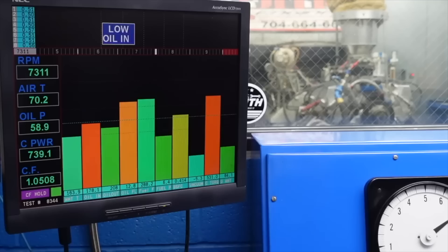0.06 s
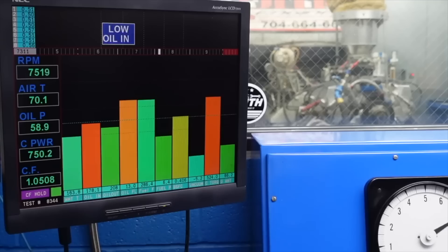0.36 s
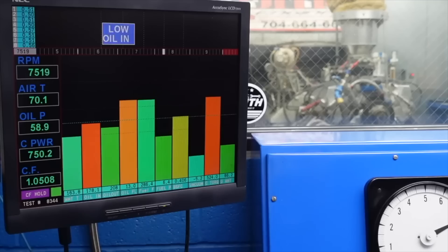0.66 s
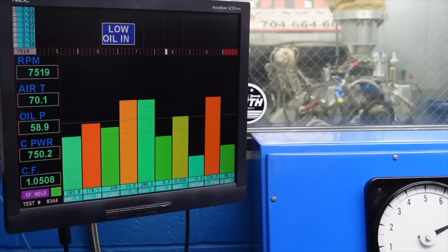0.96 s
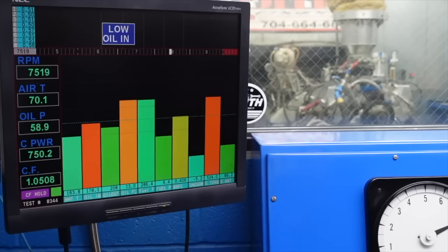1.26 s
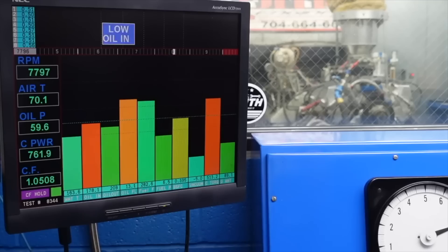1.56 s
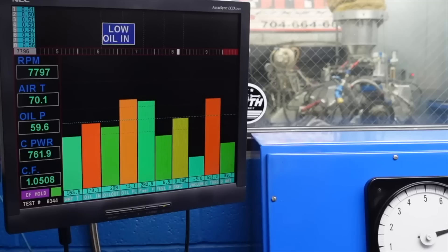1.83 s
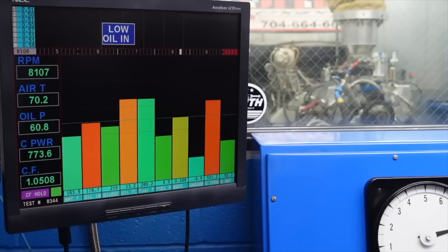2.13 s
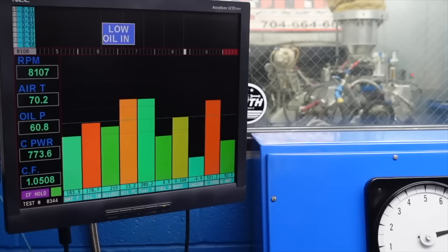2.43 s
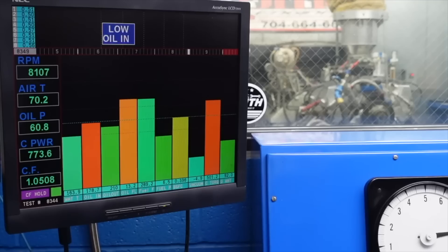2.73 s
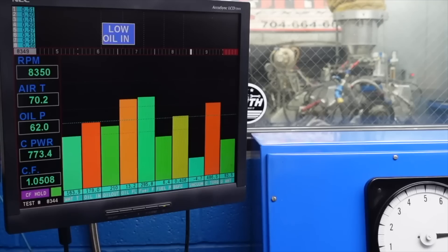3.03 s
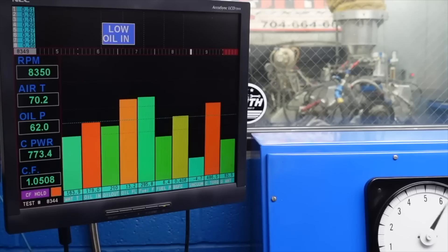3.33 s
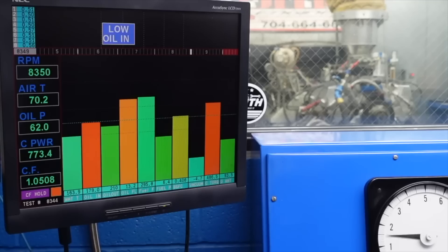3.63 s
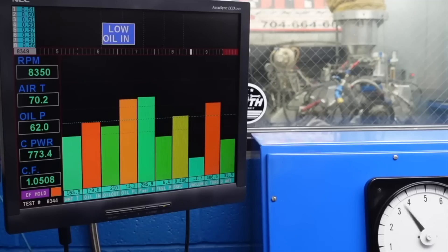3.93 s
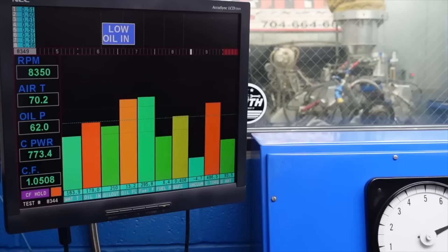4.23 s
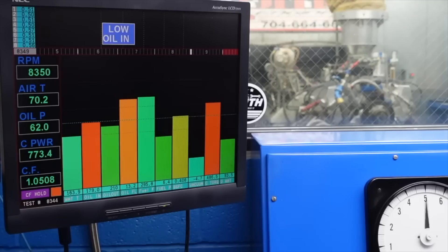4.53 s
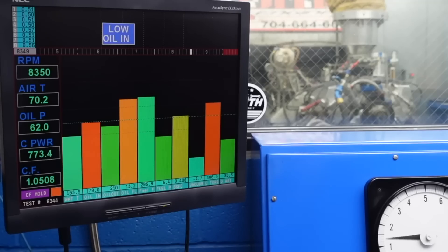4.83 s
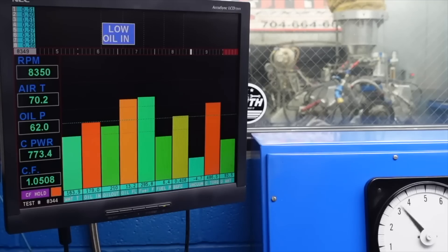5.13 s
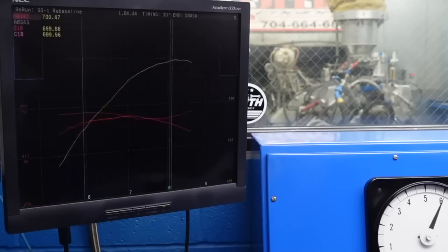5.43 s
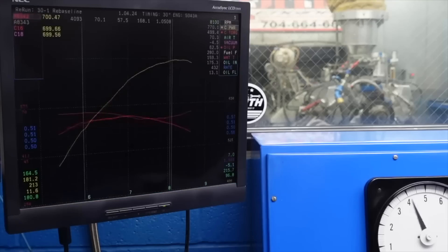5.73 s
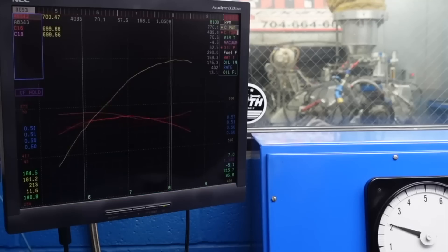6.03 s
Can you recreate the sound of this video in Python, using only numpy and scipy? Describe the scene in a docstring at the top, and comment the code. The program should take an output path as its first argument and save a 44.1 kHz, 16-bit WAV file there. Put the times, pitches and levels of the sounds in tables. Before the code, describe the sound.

A high-revving V8 climbs on a dyno behind glass, drops with pops and a brief howl, then idles quickly.

```python
"""An engine test cell, heard from the desk behind its window: a racing V8 pulls hard on the dyno.
Its firing orders climb through the standing waves of pipes and cell, over the roar of exhaust gas,
the rasp of headers and valve gear and the hiss of the intake. The throttle snaps shut, the exhaust
pops and howls on the overrun, and the engine catches and settles to a fast idle.
On this side of the glass, keys click faintly at the desk."""
import sys
import numpy as np
from scipy import signal
from scipy.fft import rfft, irfft, next_fast_len
from scipy.io import wavfile

SR = 44100
rng = np.random.default_rng(int(sys.argv[2]) if len(sys.argv) > 2 else 0)


def wrap_up_sound(samples):
    """Save the sound to the file named by the first command line argument, as 16-bit audio."""
    columns = np.atleast_2d(samples).T
    # keep every value between -1 and 1, then stretch to whole-number steps
    tamed = np.clip(columns, -1, 1)
    steps = np.round(tamed * 32767).astype(np.int16)
    wavfile.write(sys.argv[1], SR, steps)


N = 277029
TIME = np.arange(N) / SR
SIZE = next_fast_len(N)
BINS = np.fft.rfftfreq(SIZE, 1 / SR)
LIFT_S, CATCH_S, CHANGE_S = 3.07, 3.76, 0.091  # throttle shuts, engine catches, time each change takes

# Idle, fast idle, mid pull, top revs: speed/Hz (four-stroke cycles a second, half the crank speed)
OPERATING_POINTS = [33, 40, 64, 71]
# Uneven firing sounds every multiple of the cycle: order, then level/dB at each operating point
ORDER_LEVELS = [(1.0, -56.5, -57, -51, -38.5), (2.0, -45.5, -45, -26.0, -27.5),
                (3.0, -48.5, -43, -42.5, -24), (4.0, -45.5, -64, -28, -37.5),
                (5.0, -42.5, -42.5, -24.5, -36), (6.0, -53.5, -46.5, -27.5, -17),
                (7.0, -57, -33.5, -24, -19), (8.0, -34.0, -44.5, -12.5, -21),
                (9.0, -47, -50.5, -15.5, -31.5), (10.0, -46.5, -42.5, -19, -27.5),
                (11.0, -42, -32.5, -36, -32.5), (12.0, -37.5, -29.5, -36, -47),
                (13.0, -35, -31.5, -36, -37), (14.0, -32.5, -30, -43, -32),
                (15.0, -39.5, -42, -38.5, -27.5), (16.0, -43, -38.5, -27.5, -31),
                (17.0, -44.5, -53, -37, -35), (18.0, -35, -39.5, -39, -40), (19.0, -44, -51, -36, -40.5)]
def exhaust_note(speed, cycles, cell, flutter=0.17, flutter_hz=20, ripple_db=3, twist_rad=1.12):
    """Behind the glass, engine orders swell and fade as the speed carries them through standing waves."""
    out, loaded = np.zeros(N), window(-1, LIFT_S + CHANGE_S, CHANGE_S)
    firing_db = engine_levels(speed)[0] - 4 * coasting()  # weaker on the overrun
    for order, (_, *point_db) in enumerate(ORDER_LEVELS, 1):
        hz = order * speed
        db = firing_db + np.interp(speed, OPERATING_POINTS, point_db) + np.interp(hz, BINS, cell)
        ripple = ripple_db * np.minimum(wander(hz / 9), 1)
        db = on_song(order, db + loaded * ripple, loaded)
        # no two cycles burn quite alike, and reflections twist the phase as the pitch moves
        strength = 1 + flutter * wander(TIME * flutter_hz)
        lag = flutter * wander(TIME * flutter_hz) + twist_rad * wander(hz / 24)
        out += amp(db) * strength * np.cos(2 * np.pi * (order * cycles + rng.random()) + lag)
    return out

# The tuned pipes come on song during the pull: t/s, length/s, order, level/dB
PIPE_SONGS = [(-0.1, 0.49, 4, -19), (-0.1, 1.17, 3, -23.5), (-0.1, 1.34, 5, -14.5),
              (-0.02, 0.21, 16, -23.5), (0.853, 0.45, 8, -14.5), (0.88, 0.6, 10, -19),
              (1.212, 0.9, 7, -14.8), (1.94, 0.53, 16, -27.5), (2.05, 0.41, 17, -29.5),
              (2.127, 0.41, 4, -20), (2.394, 0.47, 8, -18.5), (2.495, 0.62, 14, -26),
              (2.852, 0.29, 17, -32.5)]
def on_song(order, db, loaded, off_song_db=-2.5, swell_s=0.12, drop_s=0.051):
    """Level of one order: each time its pipe comes on song it swells, holds and drops off quickly."""
    songs = [(start, length, peak_db) for start, length, k, peak_db in PIPE_SONGS if round(k) == order]
    if songs:
        db = db + loaded * off_song_db
    for start, length, peak_db in songs:
        singing = np.clip(np.minimum((TIME - start) / swell_s, (start + length - TIME) / drop_s), 0, 1)
        db = db + singing * (peak_db - db)
    return db

# The speed collapses, flares as the engine catches and sinks to idle: t/s, speed/Hz
RUN_DOWN = [(3.16, 65.7), (3.32, 47.2), (3.45, 36.2), (3.61, 37.5), (3.81, 44), (3.94, 42.8), (4.23, 38.75),
            (4.95, 34.3), (5.3, 33.3)]
def engine_speed(start_hz=62.72, climb_hz_per_s=3.04):
    """The dyno lets the speed climb evenly until the throttle shuts; then the engine runs down."""
    pull = [(0, start_hz), (LIFT_S, start_hz + climb_hz_per_s * LIFT_S)]
    return curves(pull + list(RUN_DOWN))[0]

def crank_cycles(speed, shake=0.00197, shake_hz=40, stumble_share=0.035, steady_s=0.45):
    """Cycles run so far: the crank shakes a little, stumbles as the throttle shuts, then steadies."""
    age = np.maximum(TIME - LIFT_S, 0)
    stumble = stumble_share * np.minimum(age / CHANGE_S, 1) * np.exp(-age / steady_s)
    return np.cumsum(speed * (1 + (shake + stumble) * wander(TIME * shake_hz))) / SR

def coasting():
    """1 while the engine runs on with the throttle shut, until it catches."""
    return window(LIFT_S, CATCH_S + CHANGE_S, CHANGE_S)

# Loudness follows speed: speed/Hz, then level/dB of firing, roar, rasp and hiss
LEVELS_BY_SPEED = [(33.3, -3.5, -39.5, -49, -61.5), (37.7, 1.5, -33.5, -48, -60), (45.2, 2, -30, -43, -54),
                   (64.8, 1.5, -28, -41.5, -47.5), (71, 1.26, -29.5, -40, -47.5)]
def engine_levels(speed):
    """Base levels of firing, roar, rasp and hiss at this speed, in dB."""
    speeds, *columns = np.transpose(LEVELS_BY_SPEED)
    return [np.interp(speed, speeds, column) for column in columns]

# Peaks and nulls of pipes and cell: f/Hz, width/Hz, level/dB
STANDING_WAVES = [(123, 6.3, -9.5), (137.8, 5.1, 2.5), (190, 14.6, 14.5), (234.4, 6.7, 15.5),
                  (246.5, 13.2, 13.5), (251.7, 6.3, -6), (277.6, 5.1, 9.5), (308, 7.2, -8),
                  (322.4, 23.5, 18), (353.7, 9.3, 14), (394, 5.5, 3), (406.4, 6.8, -14), (431.8, 24.5, -14),
                  (480.2, 42.7, 15), (490.7, 35.2, -13.0), (521, 7.3, -9), (524.8, 7.6, 13.5),
                  (528.8, 15, -12), (584.2, 18.2, -15.5), (674, 22, 7.5), (680.5, 15, -17.5),
                  (859, 15, 7.5), (992, 18, 3.5), (1041, 53, -8.5)]
def standing_waves_db(hz):
    """Standing waves lift or cancel each frequency on its way to the microphone."""
    return sum(db / (1 + (2 * (hz - centre) / width) ** 2) for centre, width, db in STANDING_WAVES)

# Outline of the higher orders: f/Hz, level/dB at idle, level/dB at top revs
HIGH_ORDER_LEVELS = [(670, -55, -38), (688, -45, -35), (787, -53.5, -32), (1000, -60, -30.5),
                     (1390, -63.5, -39), (1624, -69, -45), (2050, -72, -45.5), (2600, -69, -53),
                     (3360, -78, -62)]
def high_orders(speed, cycles, rough=0.36, rough_hz=45, ripple_db=7, spacing_hz=20, choke_db=-12):
    """Crowded standing waves ripple the higher orders at random; a shut throttle chokes them."""
    out = np.zeros(N)
    revs = np.interp(speed, [OPERATING_POINTS[0], OPERATING_POINTS[-1]], [0, 1])
    for order in range(len(ORDER_LEVELS) + 1, 52):
        hz = order * speed
        idle_db, top_db = spectra(HIGH_ORDER_LEVELS, hz)
        ripple = ripple_db * np.minimum(wander(hz / spacing_hz), 1)
        db = idle_db + revs * (top_db - idle_db) + ripple - 1
        strength = 1 + rough * wander(TIME * rough_hz)
        phase = 2 * np.pi * (order * cycles + rng.random()) + wander(hz / spacing_hz)
        out += amp(db) * strength * np.cos(phase)
    return amp(choke_db * coasting()) * out

# Noise spectra of exhaust gas, headers and valve gear, and intake: f/Hz, level/dB
GAS_ROAR = [(20, -28.5), (50, -21.5), (85, -10), (130, -0.5), (200, -7.5), (330, -6.5), (500, 2.5),
            (800, -8), (1150, -11.5), (1800, -25), (3000, -64.5), (6000, -87.5)]
METAL_RASP = [(200, -66.5), (500, -24.5), (900, 0), (1350, -4.5), (1750, -1), (2400, -2.5), (3000, -11),
              (4500, -28), (9000, -83)]
INTAKE_HISS = [(400, -57), (1650, -19.5), (2800, -11), (3280, -9), (3620, -3), (4210, -8.5), (4960, -7.5),
               (5500, -10), (6710, -9.5), (7630, -14.5), (9320, -17), (12200, -23.5), (15500, -32.5)]
def gas_and_gear(speed, cycles, cell, puff=0.18, lope=0.048, metal_db=3.1, gust_db=2, gust_hz=20):
    """Roar, rasp and hiss, pulsed by the eight firings and by the lope of each cycle."""
    angle = 2 * np.pi * cycles
    uneven = np.cos(angle) + np.sin(2 * angle) + np.cos(3 * angle) + np.sin(4 * angle)
    pulse = (1 + puff * np.cos(8 * angle)) * (1 + lope * uneven)
    _, roar_db, rasp_db, hiss_db = engine_levels(speed)
    metal = metal_db * np.clip(wander(BINS / 70), -1, 1)  # narrow resonances of block and headers
    gusts = amp(gust_db * wander(TIME * gust_hz))  # the gas leaves unevenly
    surges = surges_db()
    roar = amp(roar_db + surges) * noise(GAS_ROAR, pulse * gusts, 0.6 * cell)
    rasp = amp(rasp_db - 1.5 + 0.55 * surges) * noise(METAL_RASP, pulse, metal)
    hiss = amp(hiss_db + 0.48) * noise(INTAKE_HISS, pulse, metal)
    return roar + rasp + hiss

# The roar surges briefly during the pull, at the lift and at the catch: t/s, rise/dB, decay/s
ROAR_SURGES = [(0.41, 4, 0.06), (0.76, 3.5, 0.07), (0.97, 3.5, 0.03), (1.28, 7, 0.041), (3.145, 7.5, 0.49),
               (3.73, 3.5, 0.06)]
def surges_db(rise_s=0.039):
    """Each surge lifts the roar quickly and dies away."""
    return sum(db * np.clip(1 + (TIME - t) / rise_s, 0, 1) * np.exp(-np.maximum(TIME - t, 0) / decay)
               for t, db, decay in ROAR_SURGES)

# The pipe's own note: t/s, f/Hz, level/dB
HOWL_NOTE = [(3.24, 277, -14), (3.262, 279, -26), (3.338, 285, -21), (3.644, 279.3, -12),
             (3.688, 280.3, -30), (3.77, 282.6, -13.5), (3.86, 278, -31.5)]
# That note and the pulsing gas under it: multiple of the note, level/dB
HOWL_PARTIALS = [(.125, -28), (.25, -27), (.5, -14), (1, 0)]
def pipe_howl(gain_db=-1, waver=0.28, waver_hz=60):
    """With the throttle shut the pipe howls, steadier as it grows loud."""
    hz, db = curves(HOWL_NOTE)
    unsteady = waver * np.minimum(amp(db.max() - db), 3) / 2
    turns = np.cumsum(hz) / SR + unsteady / 4 * wander(TIME * waver_hz)
    note = sum(amp(part_db) * np.sin(2 * np.pi * (k * turns + rng.random()))
               for k, part_db in HOWL_PARTIALS)
    tremble = 1 + unsteady * wander(TIME * waver_hz)
    return amp(db + gain_db) * unit(note) * tremble * during(HOWL_NOTE)

# Swells of the overrun rumble: t/s, level/dB
BURBLE_SWELLS = [(3.1, -24), (3.156, -35), (3.192, -21), (3.438, -20), (3.458, -26.5), (3.66, -29),
                 (3.734, -19), (3.92, -48)]
# Its spectrum: f/Hz, level/dB
BURBLE_SPECTRUM = [(20, -45), (60, -28), (100, -12), (150, 3), (250, 3.5), (340, -8), (500, -24),
                   (1500, -90.5)]
def fuel_burble(gain_db=-2, ragged=0.21, ragged_hz=50):
    """Unburnt fuel rumbles raggedly in the pipes."""
    lumps = np.exp(ragged * wander(TIME * ragged_hz))
    level = amp(curves(BURBLE_SWELLS)[0] + gain_db) * during(BURBLE_SWELLS)
    return level * noise(BURBLE_SPECTRUM, lumps)

# Pops in the exhaust: t/s, level/dB
AFTERFIRE_POPS = [(3.244, -8.5), (3.317, -5), (3.375, -7), (3.401, -17), (3.423, -12), (3.442, -6),
                  (3.708, -18), (3.734, -5.5)]
def afterfire(ring_hz=270, rise_s=0.0042, crack=0.21, gain_db=-7.5):
    """Each pop is a short burst that rings the pipe for a few swings."""
    out, grit = np.zeros(N), noise(GAS_ROAR)
    for start, db in AFTERFIRE_POPS:
        age = np.maximum(TIME - start, 0)
        burst = age / rise_s * np.exp(1 - np.minimum(age / rise_s, 20))
        ring = np.sin(2 * np.pi * ring_hz * rng.uniform(.88, 1.12) * age)
        out += amp(db + gain_db) * burst * (ring + crack * grit)
    return out

# Keystrokes: t/s, level/dB
KEYSTROKES = [(5.2793, -45), (5.5462, -41), (5.7893, -45), (6.0153, -42), (6.1848, -36.5)]
# Spectrum of a plastic key: f/Hz, level/dB
KEY_SPECTRUM = [(1200, -18), (3000, 8), (6000, -7), (9500, -11), (12000, -18), (16000, -25)]
def desk_keys(t60_s=0.1, gain_db=-9):
    """Faint dry plastic clicks at the desk, on the microphone's side of the window."""
    level = sum((TIME > t) * amp(db + gain_db - 60 * np.minimum(abs(TIME - t) / t60_s, 2))
                for t, db in KEYSTROKES)
    return level * noise(KEY_SPECTRUM)

# Background at the desk: f/Hz, level/dB
ROOM_TONE = [(20, 12), (70, 26), (110, 25), (200, 11), (1000, 10), (5000, 6), (10000, -0.5), (16000, 4)]
def room_tone(level_db=-63):
    """A steady low rumble and thin hiss, far below the engine."""
    return amp(level_db) * noise(ROOM_TONE)

def amp(db):
    """Decibels to gain."""
    return 10 ** (np.asarray(db) / 20)

def unit(x):
    """Scales to rms 1."""
    return x / np.sqrt(np.mean(abs(x) ** 2) + 1e-20)

def curves(rows):
    """Each column of a time table, sample by sample."""
    times, *columns = np.transpose(rows)
    return [np.interp(TIME, times, column) for column in columns]

def spectra(rows, hz):
    """Each column of a spectrum table, read on a log-frequency axis."""
    freqs, *columns = np.transpose(rows)
    return [np.interp(np.log(hz + 1), np.log(freqs), column) for column in columns]

def window(start, end, fade_s):
    """1 from start to end, with soft ends."""
    return np.clip(np.minimum(TIME - start, end - TIME) / fade_s, 0, 1)

def during(rows):
    """1 while a time table lasts, with soft ends."""
    return window(rows[0][0], rows[-1][0], fade_s=0.021)

def noise(shape, gate=1, extra_db=0):
    """Gated noise with the given spectrum, rms 1."""
    white = rfft(gate * rng.standard_normal(N), SIZE)
    gain = amp(spectra(shape, BINS)[0] + extra_db)
    return unit(irfft(white * gain, SIZE)[:N])

def wander(position):
    """Glides to a new random value once for each unit of position."""
    return np.interp(position, np.arange(4096), rng.standard_normal(4096))

def scene():
    """One listening spot at the desk: the engine beyond the window, the keys and room tone before it."""
    speed, cell = engine_speed(), standing_waves_db(BINS)
    cycles = crank_cycles(speed)
    firing = exhaust_note(speed, cycles, cell) + high_orders(speed, cycles)
    engine = firing + gas_and_gear(speed, cycles, cell)
    overrun = pipe_howl() + fuel_burble() + afterfire()
    return (engine + overrun + desk_keys() + room_tone())[None]

def record(dry, edge_hz=15800):
    """A mono microphone channel with the top of the treble cut off."""
    lowpass = signal.firwin(511, edge_hz, window=("kaiser", 9), fs=SR)
    return signal.oaconvolve(dry, lowpass[None], "same")

dry = scene()
out = record(dry)
wrap_up_sound(out)
```